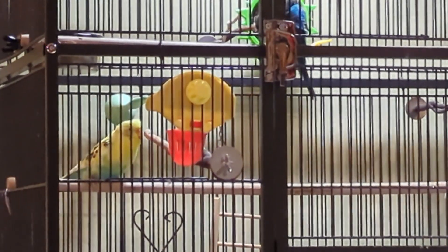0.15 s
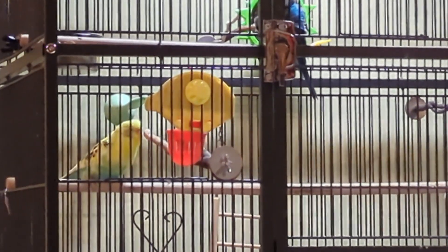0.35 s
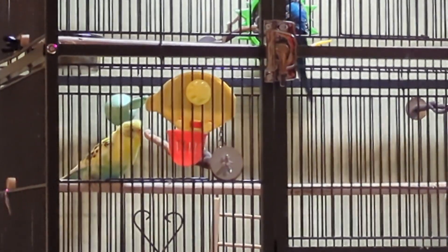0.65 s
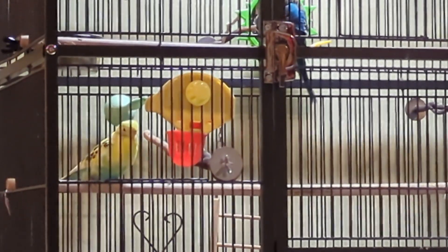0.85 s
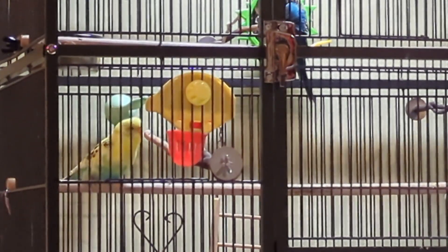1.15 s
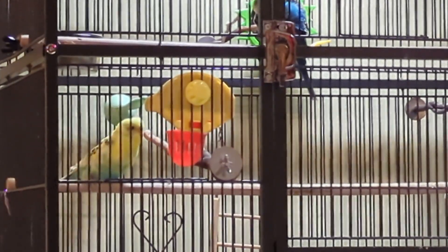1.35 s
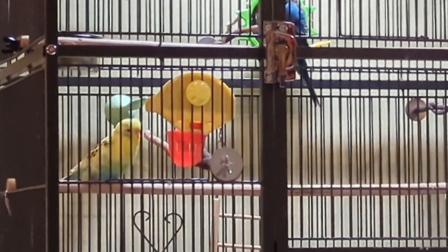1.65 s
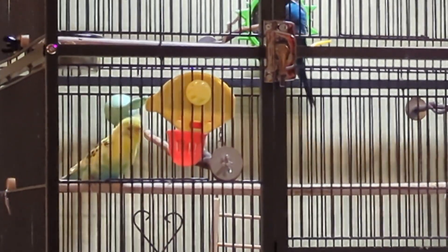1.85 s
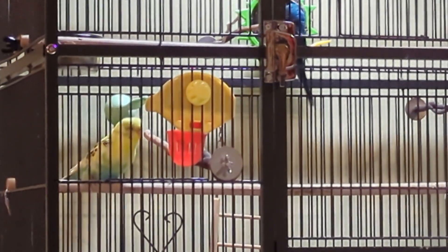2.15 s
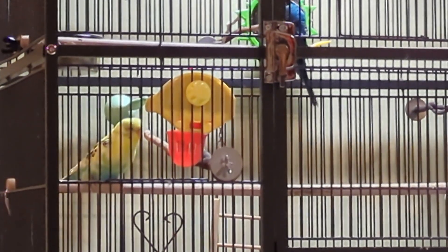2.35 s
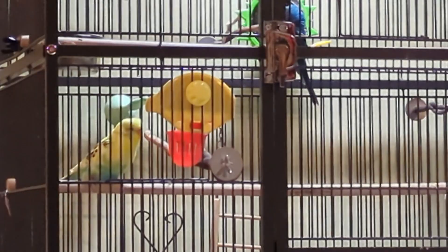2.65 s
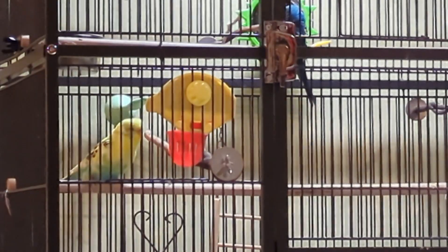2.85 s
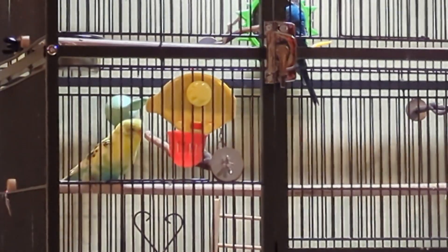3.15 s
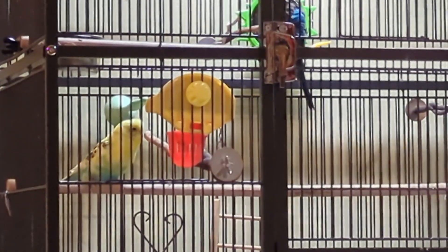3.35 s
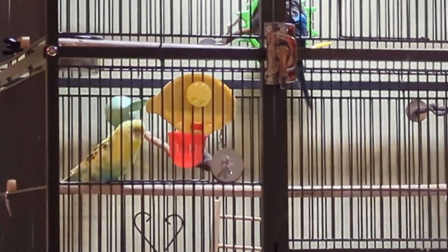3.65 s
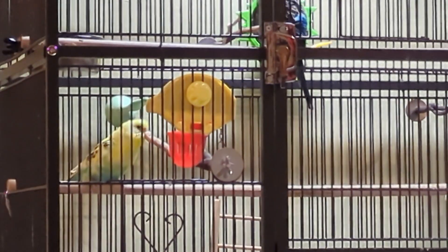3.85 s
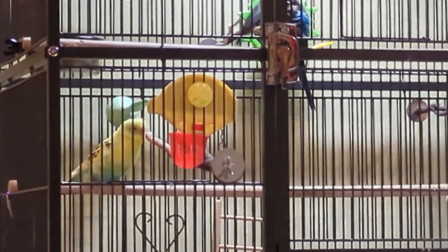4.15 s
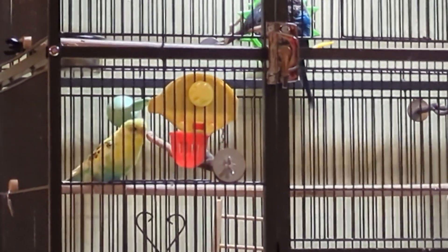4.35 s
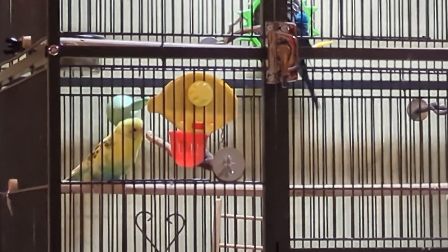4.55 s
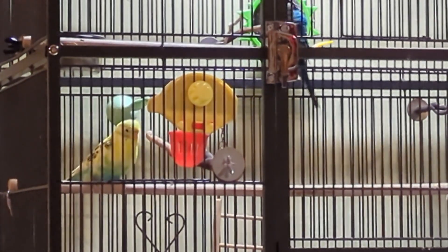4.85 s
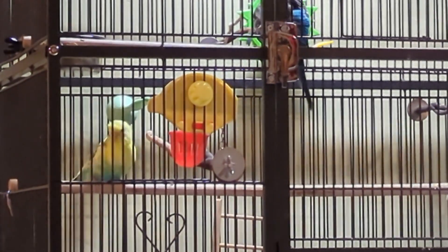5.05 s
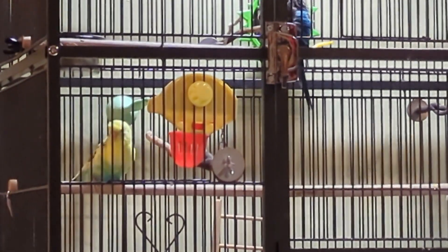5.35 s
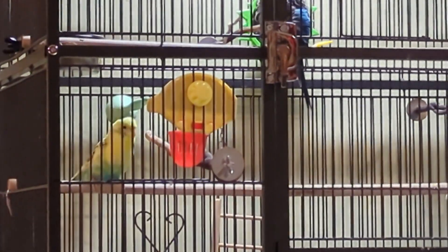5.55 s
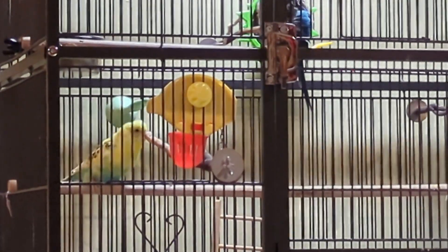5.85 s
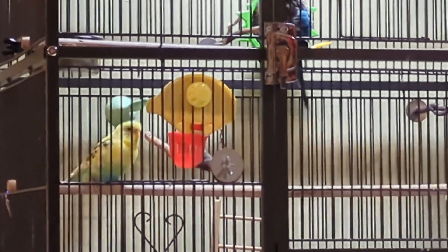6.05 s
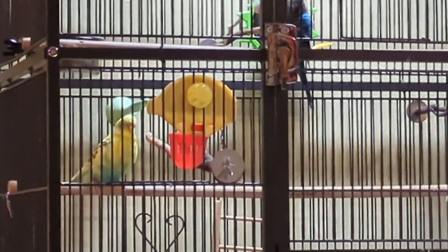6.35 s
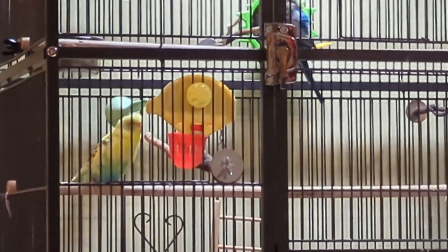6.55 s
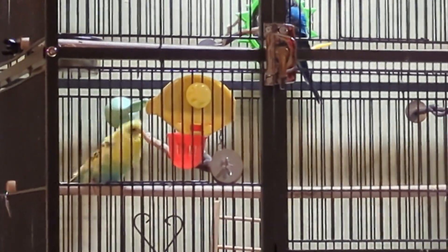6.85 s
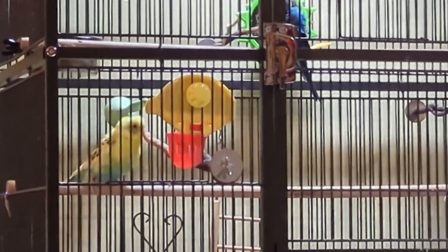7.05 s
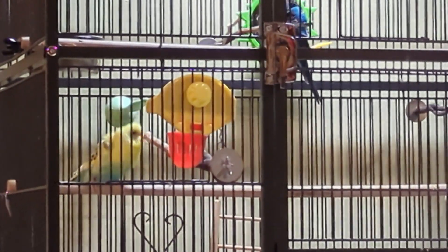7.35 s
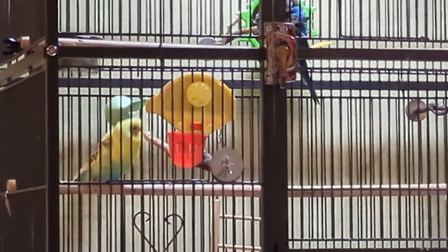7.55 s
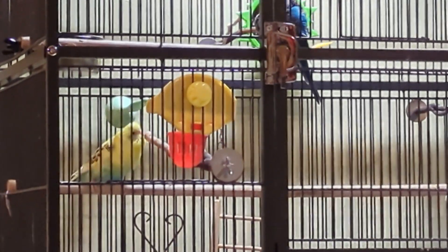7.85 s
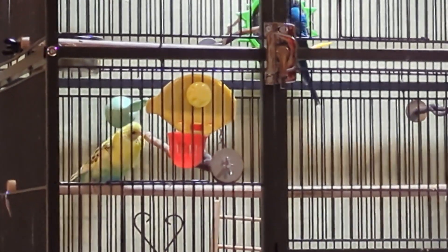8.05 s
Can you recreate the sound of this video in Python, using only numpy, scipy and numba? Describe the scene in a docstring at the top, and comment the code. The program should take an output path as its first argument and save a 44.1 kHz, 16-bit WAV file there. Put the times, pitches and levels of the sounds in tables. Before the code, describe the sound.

A hard-walled room with caged budgerigars, about eight seconds. One bird warbles softly nearly throughout: short phrases of rapid, buzzy chirps, mostly around 2 to 4 kHz, gliding up or down, with small gaps. A closer bird gives brief, hoarse, bright squawks, far louder: one at 0.7, then 3.3 and 3.9, a close pair at 4.9 and 5.0, another pair at 6.0 and 6.1, two at 7.0 and 7.2, and one at 7.9. Dry, tiny husk cracks are scattered mainly over the first three seconds, with later ones at 4.2 and 7.0. Thin metallic beak ticks on wire come at 4.5, 5.4, 5.9, 6.4 and 6.7. A short bright reverberation follows the calls. Underneath, steady faint mains hum and soft room rumble. Everything sits in the left channel; the right holds only very quiet hiss.

```python
"""Budgerigars in a hard-walled room

One bird warbles quick gliding notes and soft chatter; another squawks hoarsely close by. Whistles are gliding
sines with sidebands; squawks are noisy pulses ringing throat and beak resonances. Beaks tick on the cage wire
(decaying sines); short broadband snaps and one rasp are noise bursts, over a faint mains hum and room rumble.
Only the left input has a microphone; the right one carries its amplifier's hiss."""
import sys
import numpy as np
from scipy import signal
from scipy.fft import rfft, irfft, next_fast_len
from scipy.io import wavfile
from scipy.ndimage import uniform_filter1d
from numba import njit

SR = 44100
rng = np.random.default_rng(int(sys.argv[2]) if len(sys.argv) > 2 else 0)


def store_pcm(level_fs):
    """Save levels as 16-bit WAV."""
    pcm = np.round(np.clip(level_fs, -1, 1) * 32767).astype(np.int16)
    wavfile.write(sys.argv[1], SR, np.atleast_2d(pcm).T)


N = 361179  # length [samples]

# Clearest warbled notes, levels before room and microphone gain:
# (time [s], length [ms], start pitch [Hz], end pitch [Hz], level [dB])
CLEAR_NOTES = [(0.0, 11, 4000, 3260, -49), (0.096, 17, 3550, 3220, -63.5), (0.136, 52, 2910, 2650, -65),
               (0.152, 19.4, 2270, 1920, -64), (0.205, 22, 3200, 2640, -65.5),
               (0.229, 8, 2080, 2080, -60.5), (0.415, 51, 1830, 1350, -70.5),
               (0.534, 28, 3330, 4840, -66.5), (0.557, 10, 2300, 2090, -66), (0.576, 10, 3470, 3150, -69),
               (0.593, 18, 2944, 2730, -58.5), (0.626, 17, 3500, 3830, -61.5), (0.86, 7.9, 4350, 4250, -53),
               (0.879, 27, 3620, 2710, -57.5), (0.906, 7.8, 2140, 2480, -53.5),
               (0.921, 20.5, 3494, 3040, -49), (0.938, 5, 2780, 2980, -46.5), (0.97, 14.5, 1370, 1236, -66),
               (1.003, 38, 2276, 3330, -63), (1.03, 12, 4300, 3840, -64), (1.288, 11.4, 2560, 890, -61),
               (1.295, 29, 2480, 2070, -62.5), (1.462, 10, 3700, 3460, -64.5),
               (1.529, 46, 3850, 2120, -65.5), (1.649, 35, 2750, 2950, -68), (1.693, 24, 2245, 1810, -66),
               (1.743, 27, 3830, 3650, -68), (1.746, 11, 3280, 3020, -64), (1.758, 15, 2335, 1820, -63),
               (2.218, 25.5, 3250, 3014, -67.5), (2.33, 49.2, 1467, 1070, -72.5),
               (2.459, 16.4, 3980, 1680, -53.5), (2.502, 14, 3660, 3680, -55), (2.515, 24, 2950, 2840, -55),
               (2.536, 14, 2194, 2220, -57.5), (2.558, 9.1, 3810, 3100, -51.5),
               (2.572, 8.4, 5050, 5000, -61.5), (2.586, 12, 3340, 3250, -49),
               (2.636, 19, 3481, 3150, -63.5), (2.646, 11, 2793, 2740, -58.5), (2.858, 29, 3793, 1298, -63),
               (2.9, 117, 1170, 1218, -69.5), (2.942, 10, 2758, 2750, -58.5),
               (2.955, 21.3, 3675, 3315, -55), (3.072, 28.3, 4465, 2870, -57),
               (3.083, 23, 2760, 2750, -60.5), (3.15, 21, 3447, 2812, -59.5),
               (3.236, 14.2, 3440, 3527, -54), (3.247, 15, 2596, 2790, -57), (4.021, 31, 2760, 2760, -69.5),
               (4.294, 14, 5102, 3524, -68), (4.518, 13.2, 2520, 3860, -59), (4.531, 21, 3880, 2770, -62.5),
               (4.59, 13.6, 3300, 2570, -59), (4.668, 13.1, 2690, 4330, -50.5),
               (4.734, 28, 3337, 2980, -50), (4.814, 21.5, 2780, 2840, -58.5),
               (4.834, 22, 2912, 4440, -54.5), (5.151, 12.6, 1442, 1105, -62.5),
               (5.322, 29.5, 3470, 3140, -59), (5.315, 19.6, 1664, 1566, -67.5),
               (5.36, 28.6, 2476, 1980, -61), (5.388, 22, 2680, 2780, -60.5), (5.415, 13, 4010, 3390, -63),
               (5.566, 31, 2687, 2830, -63.5), (5.6, 53, 2460, 1880, -69.5),
               (5.698, 13.35, 3235, 4610, -67.5), (5.713, 13.6, 3760, 3500, -45.5),
               (5.729, 8.3, 1980, 2000, -54.5), (5.742, 22, 3250, 3230, -54.5),
               (5.784, 19, 2465, 2850, -53), (5.799, 14, 3740, 3460, -51), (5.815, 13, 3500, 3240, -47.5),
               (6.205, 6.8, 2150, 2000, -55.5), (6.212, 11, 2806, 2600, -46.5),
               (6.232, 13, 4280, 4490, -54), (6.24, 22, 2616, 2880, -49), (6.258, 4.4, 3520, 3300, -39),
               (6.296, 15, 3900, 4104, -60), (6.363, 43, 3350, 1880, -56.5), (6.455, 17, 3745, 3150, -64),
               (6.468, 17.2, 2990, 2730, -58), (6.498, 64, 1966, 1800, -65), (6.58, 21, 2300, 1960, -65.5),
               (6.685, 27, 2830, 1889, -62.5), (6.926, 5, 2218, 1960, -51.5),
               (6.953, 13.7, 3447, 3360, -49.5), (7.278, 22.1, 2605, 3720, -48),
               (7.39, 8.3, 3687, 1339, -47.5), (7.428, 5.9, 4100, 6050, -39), (7.48, 39, 3632, 2660, -55),
               (7.531, 40, 1403, 1090, -71.5), (7.577, 7, 3267, 3246, -55.5), (7.67, 20.2, 3890, 2640, -59),
               (7.785, 16.5, 3500, 3150, -57), (8.012, 17, 2920, 2724, -59.5), (8.129, 40, 3560, 2790, -52),
               (8.17, 18.5, 2775, 3490, -45.5)]


def clear_notes():
    """Frequency glide: each note sweeps linearly from one pitch to another."""
    out = np.zeros(N)
    for start_s, ms, start_hz, end_hz, level_db in CLEAR_NOTES:
        flutter_hz = rng.uniform(400, 900)
        flutter = .15 + .4 * rng.random() ** 2
        whistle = note(ms, start_hz, end_hz, flutter_hz, flutter, air_db=-22.5)
        add(out, start_s, gain(level_db) * whistle)
    return out


# Phrases of soft chatter, one breath each; pitches are the line about which the chirps scatter:
# (time [s], length [s], level [dB], first pitch [Hz], last pitch [Hz], air against tone [dB])
PHRASES = [(0.108, 0.14, -66, 3057, 2020, -10), (0.412, 0.1, -74, 3560, 3620, 0),
           (0.552, 0.15, -61.5, 2930, 2740, -6.5), (0.802, 0.25, -60.5, 3146, 2897, -15),
           (1.333, 0.46, -70.5, 2020, 2550, -12.5), (1.765, 0.066, -64.5, 2530, 2260, -19),
           (1.988, 0.183, -73, 2500, 2130, -35), (2.206, .21, -61.5, 3302, 1720, -13.5),
           (2.453, 0.35, -62, 3190, 1890, -11.5), (2.858, 0.12, -58.5, 2626, 2682, -19),
           (3.092, 0.13, -64.5, 2860, 2610, -15), (3.237, 0.098, -57.5, 2973, 2630, -17),
           (3.489, 0.15, -59.5, 3530, 1906, -33), (3.689, 0.18, -69, 2240, 2376, -24),
           (4.001, 0.13, -65.5, 2910, 1693, -33), (4.312, 0.17, -63.5, 2999, 1804, -19),
           (4.521, .13, -62.5, 3230, 2292, -21), (4.671, 0.15, -57, 3070, 2820, -23),
           (5.139, 0.11, -66, 1707, 2777, -24), (5.418, .13, -63.5, 2830, 1890, -28.5),
           (5.695, 0.25, -64.5, 3240, 3267, -9), (6.19, 0.44, -61.5, 3260, 1950, -32.5),
           (6.688, 0.15, -70.5, 2218, 2225, -28), (6.886, 0.16, -63, 2710, 2918, -18),
           (7.389, 0.26, -62.5, 3055, 2439, -32), (7.69, 0.17, -63, 2310, 2136, -32),
           (7.961, 0.14, -60, 2475, 2310, -26), (8.136, 0.04, -56.5, 2916, 3045, -29)]
CHIRPS_PER_S = 95
CHIRP_SCATTER_DB, CHIRP_SPREAD_OCTAVES = 9, .9  # full widths
PHRASE_FADE_DB = -4.5  # over the phrase, as the breath runs out
LOW_CHIRP_DB_PER_OCTAVE = 5.5  # low chirps carry less well


def chatter():
    """Pulse train of a breath: small steep chirps, some buzzy, drift in pitch and fade."""
    out = np.zeros(N)
    for start_s, length_s, level_db, first_hz, last_hz, air_db in PHRASES:
        for k in range(int(length_s * CHIRPS_PER_S) + 1):
            s = (k + rng.random()) / CHIRPS_PER_S
            line_hz = first_hz + (last_hz - first_hz) * s / length_s
            hz = line_hz * 2 ** (CHIRP_SPREAD_OCTAVES * (rng.random() - .6))
            db = level_db + PHRASE_FADE_DB * s / length_s
            db += CHIRP_SCATTER_DB * (rng.random() - .5)
            db += LOW_CHIRP_DB_PER_OCTAVE * np.log2(hz / first_hz)
            ms = rng.uniform(5, 18)
            steepness = rng.random()  # most chirps fall, the least steep rise slightly
            start_hz, end_hz = hz * (.96 + .28 * steepness), hz * (1.02 - .3 * steepness)
            flutter_hz = rng.uniform(400, 900)
            flutter = .1 + .8 * rng.random() ** 2
            chirp = note(ms, start_hz, end_hz, flutter_hz, flutter, air_db)
            add(out, start_s + s, gain(db) * chirp)
    return out


def note(ms, start_hz, end_hz, flutter_hz, flutter, air_db):
    """Amplitude modulation: a second membrane chops the syrinx whistle into a stack of sidebands."""
    u = np.linspace(0, 1, int(ms * SR / 1000))  # fraction of the note
    glide_hz = start_hz + (end_hz - start_hz) * u
    hz = glide_hz * (1 + 0.039 * walk(406, size=len(u)))
    phase = 2 * np.pi * np.cumsum(hz) / SR
    beat = unit_rms(np.exp(flutter * np.sin(2 * np.pi * flutter_hz * u * ms / 1000)))
    tone = np.sin(phase) + gain(-23) * np.sin(2 * phase)
    air = gain(air_db) * band(white(len(u)), 4100, 3400)  # rushes past the membranes
    swell = np.sin(np.pi * u ** .55) ** .7
    return np.sqrt(2) * (tone + air) * beat * swell


# Squawks, throat resonances before the throat's scaling and wander:
# (time [s], level [dB], lower throat [Hz], upper throat [Hz], lower throat gain [dB], swell [ms], fade [ms])
SQUAWKS = [(.684, -36, 3650, 5800, -3, 33, 40), (3.345, -37, 3390, 5800, -4, 76, 25),
           (3.859, -33.5, 3425, 5776, -12, 46.5, 13.4), (4.915, -34, 3492, 5900, -8, 52, 43),
           (5.028, -34, 3502, 6300, -7.5, 38, 35), (5.976, -32, 3532, 5416, -7, 48.3, 2.5),
           (6.13, -33.5, 3550, 6440, -8.5, 32.5, 30), (7.037, -34.5, 3460, 6450, -11, 57.4, 37),
           (7.198, -33, 3420, 5257, -6, 44.7, 22.7), (7.858, -35.5, 3343, 6197, -7.5, 49.5, 9)]
# Beak resonances, before the same scaling: (frequency [Hz], width [Hz], gain [dB])
BEAK_RESONANCES = [(1910, 960, -20.5), (8160, 380, -9.5), (10540, 2700, -20.5), (13900, 3900, -28)]
RASP_PER_S, RASP_DEPTH = 190, .45  # mean rate of the quick bursts; depth as an exponent


def squawker():
    """Source and filter: uneven puffs of slapping membranes ring a throat that opens as the call swells."""
    out = np.zeros(N)
    for start_s, level_db, low_hz, high_hz, low_db, swell_ms, fade_ms in SQUAWKS:
        ms = np.arange(int(.2 * SR)) * 1000 / SR
        size = len(ms)
        # about 750 slaps a second over breath noise
        slaps = np.cumsum(SR / 750 * np.exp(.15 * white(400))).astype(int)
        slaps = slaps[slaps < size]
        puffs = .25 * white(size)
        puffs[slaps] += rng.uniform(.7, 1.2, len(slaps))

        opening = np.clip(ms / swell_ms, 0, 1)
        throat = (0.886 + 0.14 * opening) * (1 + 0.091 * walk(84.8, size=size))
        low = gain(low_db) * band(puffs, low_hz * throat, 670)
        high = band(puffs, high_hz * throat, 1300)
        high = gain(-0.5) * band(high, high_hz * throat, 1300)
        beak = np.zeros(size)
        for k, (hz, width, db) in enumerate(BEAK_RESONANCES):
            polarity = (-1) ** (k + 1)
            beak += polarity * gain(db) * band(puffs, hz * throat, width)
        call = low + (beak - high) * opening ** 0.21  # these bands wait for the beak to open

        rise = np.sin(np.pi / 2 * opening)
        fade = np.exp(-(np.maximum(ms - swell_ms, 0) / fade_ms) ** 2)
        rasp_phase = 2 * np.pi * np.cumsum(RASP_PER_S * (1 + 0.399 * walk(60, size=size))) / SR
        rasp = np.exp(RASP_DEPTH * (np.sin(rasp_phase) - .5))
        add(out, start_s, gain(level_db) * unit_rms(thin(call)) * rise * fade * rasp)
    return out


# Beak on wire: (time [s], peak level [dB])
WIRE_TICKS = [(4.463, -54.5), (4.5084, -46.5), (4.53, -43), (5.376, -54), (5.846, -57), (5.881, -55.5),
              (6.375, -40), (6.7029, -59), (6.72, -48)]
# Modes of the wire, relative levels before a random scatter: (frequency [Hz], level [dB], t60 [s])
WIRE_MODES = [(5100, 0, 0.051), (6090, 11, 0.03), (8100, 5, 0.068), (8120, 0, 0.099), (10950, -6.5, 0.019)]


def wire_ticks():
    """Modal ringing: a tap of the beak starts the wire's modes, each decaying at its own rate."""
    out, t = np.zeros(N), np.arange(SR // 10) / SR
    for start_s, peak_db in WIRE_TICKS:
        ring = np.zeros(len(t))
        for hz, db, t60 in WIRE_MODES:
            decay_db = db + 2 * rng.standard_normal() - 60 * t / t60
            ring += gain(decay_db) * np.sin(2 * np.pi * hz * t)
        ring *= gain(11 * walk(400, size=len(t)))  # the wire rattles in its joints
        ring *= np.clip(t / .002, .2, 1)
        tap = gain(10 - 60 * t / 0.04) * unit_rms(band(white(len(t)), 4000, 9000))
        add(out, start_s, gain(peak_db) * unit_peak(ring + tap))
    return out


# Short noise bursts, snaps and one rasp: (time [s], peak level [dB], centre frequency [Hz])
NOISE_BURSTS = [(0.157, -53, 4500), (0.4148, -67, 4600), (1.1245, -57.5, 6600), (1.294, -63, 4300),
                (1.589, -65.5, 7800), (1.657, -63.5, 6160), (1.904, -64, 6200), (2.011, -61.5, 6200),
                (2.069, -64, 4060), (2.154, -66, 5770), (2.8643, -64.5, 4778), (4.161, -61, 4080),
                (7.014, -56, 4250)]
SECOND_SNAP_S, SECOND_SNAP_DB = 0.012, -5.5  # typical delay, and level against the first


def noise_bursts():
    """Impulsive noise: a dry burst of band noise dies within 28 ms by 60 dB, then snaps again softer."""
    out, t = np.zeros(N), np.arange(SR // 10) / SR
    for start_s, peak_db, hz in NOISE_BURSTS:
        crack = unit_rms(band(white(len(t)), hz, 2000)) * gain(-60 * t / 0.028)
        crack = unit_peak(crack)
        add(out, start_s, gain(peak_db) * crack)
        second_s = start_s + SECOND_SNAP_S * rng.uniform(0.76, 1.3)
        add(out, second_s, gain(peak_db + SECOND_SNAP_DB) * crack)
    return out


# Mains lines, before microphone gain: (frequency [Hz], rms level [dB])
HUM = [(120, -70.5), (360, -87)]


def mains_hum():
    """Harmonic line spectrum: mains tones that waver a little in level and phase."""
    t = np.arange(N) / SR
    hum = np.zeros(N)
    for hz, db in HUM:
        level = np.sqrt(2) * gain(db + 0.5 * walk(21))
        cycles = hz * t + 0.031 * walk(34)
        hum += level * np.sin(2 * np.pi * cycles)
    return hum


# Shape of the room's rumble and air: (frequency [Hz], relative density [dB per Hz])
RUMBLE = [(25, -37), (36, -19.5), (48, -9), (119, 0), (240, -10), (281, -20), (523, -24), (782, -16),
          (1140, -18), (1950, -19.5), (2700, -26.5), (4750, -37), (8130, -41.5), (15500, -68.5)]


def rumble():
    """Broadband background: stationary noise of the room's rumble and air."""
    return gain(-68.5) * coloured(RUMBLE)


# Shape of the amplifier's hiss: (frequency [Hz], relative density [dB per Hz])
HISS = [(25, -31.5), (40, -21), (60, 3), (120, -7), (200, -14), (800, -21), (6500, -26.5), (10000, -31),
        (15500, -37)]


def amplifier_hiss():
    """Electronic noise: stationary random noise of the right input's amplifier."""
    return gain(-82.5) * coloured(HISS)


# Pitches that the cage corner favours: (frequency [Hz], width [Hz], gain [dB])
CAGE = [(1490, 310, -3), (2004, 380, -7), (2724, 180, -5.5), (3283, 100, -9.5), (3642, 120, -7)]


def cage(x):
    """Resonance: the corner where the cage stands lifts a few pitches."""
    lifted = gain(-2.5) * x
    for hz, width, db in CAGE:
        lifted += gain(db) * band(x, hz, width)
    return lifted


# Bands of the reverberant tail: (frequency [Hz], width [Hz], t60 [s], relative level [dB])
ROOM = [(1260, 1380, 0.19, 5.5), (4170, 4400, 0.44, -4), (6760, 11000, 0.25, 5), (12200, 54000, 0.14, 12)]


def room(x, wet_db):
    """Reverberation: direct sound plus a dense tail whose bands decay at different rates."""
    t = np.arange(SR // 2) / SR
    tail = np.zeros(len(t))
    for hz, width, t60, db in ROOM:
        tail += gain(db - 60 * t / t60) * unit_rms(band(white(len(t)), hz, width))
    tail *= np.clip((t - .003) / 0.0012, 0, 1)  # the first walls answer after a few ms
    tail /= np.sqrt(np.sum(tail ** 2))
    return x + gain(wet_db) * signal.fftconvolve(x, tail)[:N]


def thin(x):
    """Radiation efficiency: a small bird radiates no bass."""
    return signal.sosfilt(signal.butter(3, 1100, "high", fs=SR, output="sos"), x)


@njit
def moving_band(x, hz, width):
    """Resonance: a state-variable band-pass whose centre moves every sample."""
    y, band_state, low_state = np.empty(len(x)), 0., 0.
    for i in range(len(x)):
        g = np.tan(np.pi * hz[i] / SR)
        damping = width / hz[i]
        v = (band_state + g * (x[i] - low_state)) / (1 + g * (g + damping))
        band_state = 2 * v - band_state
        low_state += 2 * g * v
        y[i] = damping * v
    return y


def band(x, hz, width):
    """Resonance of unit gain at its centre, fixed or moving."""
    return moving_band(x, np.zeros(len(x)) + hz, 1. * width)


def coloured(spectrum):
    """Spectral shaping: steady noise of the given spectrum, rms 1."""
    hz, db = np.transpose(spectrum)
    size = next_fast_len(N)
    bins = np.arange(size // 2 + 1) * SR / size + 1
    shape = gain(np.interp(np.log(bins), np.log(hz), db))
    return unit_rms(irfft(rfft(white(size)) * shape, size)[:N])


def walk(rate, size=N):
    """Slow fluctuation: random levels held 1 / rate s and smoothed twice."""
    k = int(SR / rate)
    held = np.repeat(white(size // k + 1), k)
    return uniform_filter1d(uniform_filter1d(held, k), k)[:size]


def white(size):
    """White noise: independent Gaussian samples."""
    return rng.standard_normal(size)


def gain(db):
    """Level law: decibels to an amplitude factor."""
    return 10 ** (np.asarray(db) / 20)


def unit_rms(x):
    """Normalisation to equal power."""
    return x / np.sqrt(np.mean(x ** 2))


def unit_peak(x):
    """Normalisation to equal peak amplitude."""
    return x / np.max(np.abs(x))


def add(out, s, x):
    """Superposition: mix a short sound in at s seconds."""
    i = max(int(s * SR), 0)
    out[i:i + len(x)] += x[:max(N - i, 0)]


def scene():
    """Superposition: birds, beaks and background at the left input, hiss alone at the right."""
    warbler = room(cage(clear_notes() + chatter()), 0.68)
    squawks = room(cage(squawker()), -2)  # the near bird stands out of the room
    beaks = room(wire_ticks() + noise_bursts(), -6)
    heard = warbler + squawks + beaks + mains_hum() + rumble()
    return np.array([gain(8) * heard, amplifier_hiss()])  # microphone gain of 8 dB


def record(dry):
    """Band limiting: the recorder cuts the top above 15.8 kHz."""
    return signal.sosfilt(signal.ellip(10, .2, 70, 15800, fs=SR, output="sos"), dry)


dry = scene()
out = record(dry)
store_pcm(out)
```